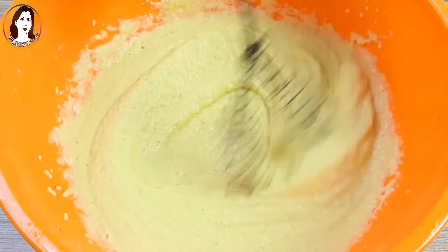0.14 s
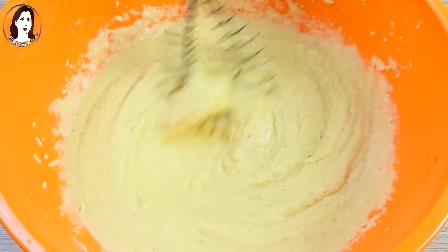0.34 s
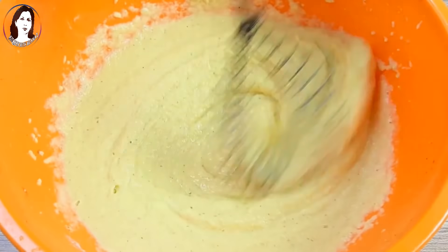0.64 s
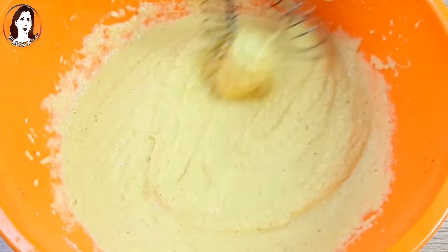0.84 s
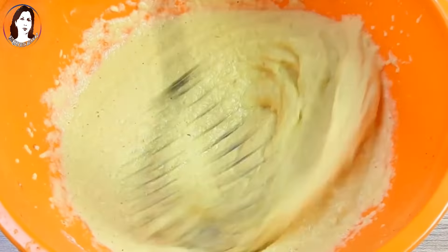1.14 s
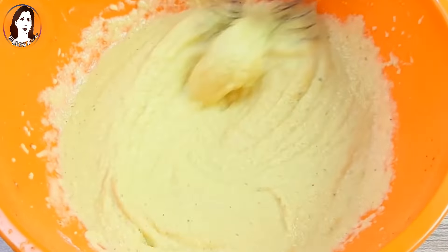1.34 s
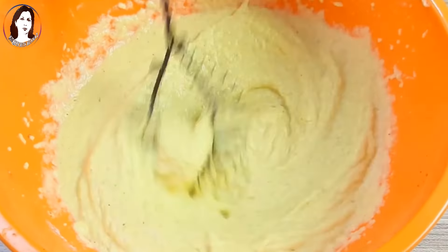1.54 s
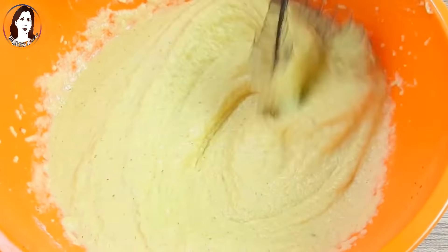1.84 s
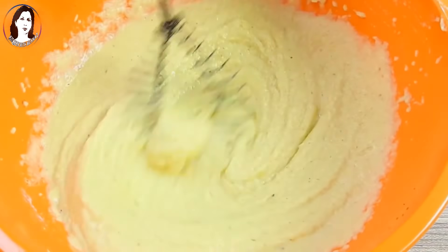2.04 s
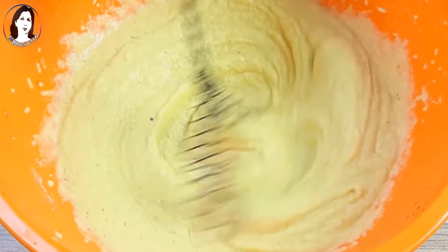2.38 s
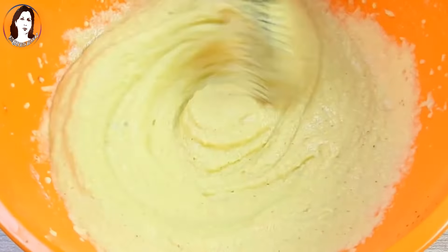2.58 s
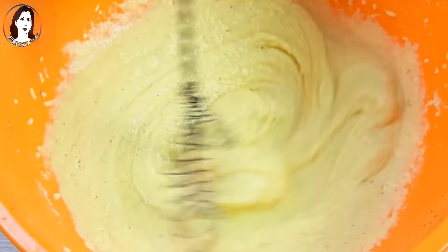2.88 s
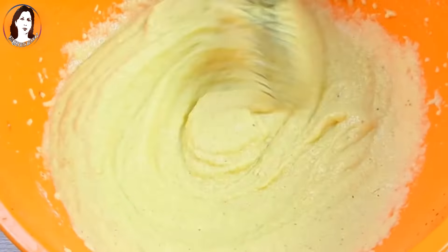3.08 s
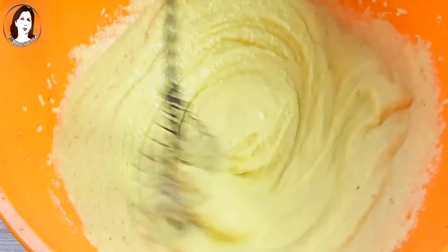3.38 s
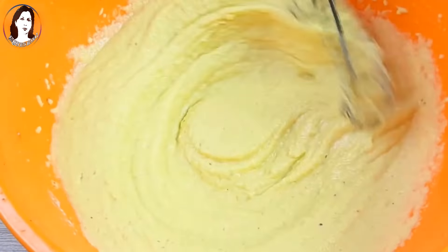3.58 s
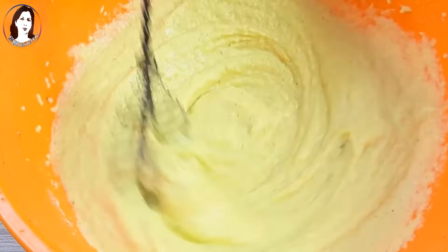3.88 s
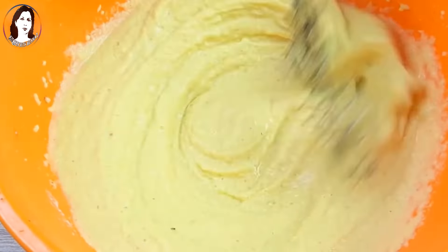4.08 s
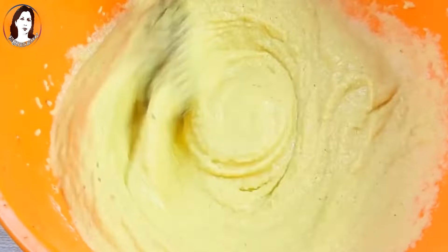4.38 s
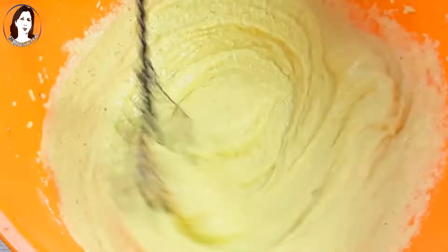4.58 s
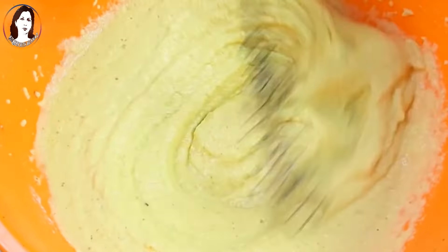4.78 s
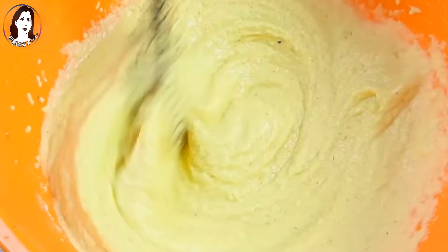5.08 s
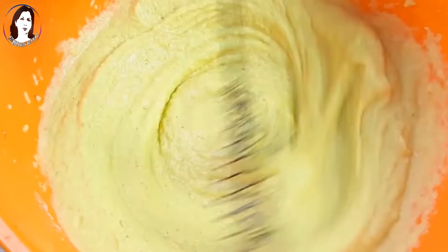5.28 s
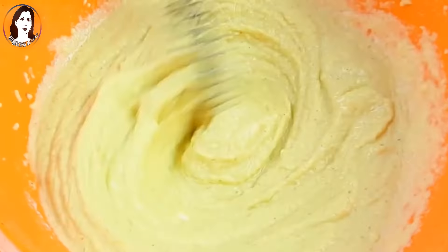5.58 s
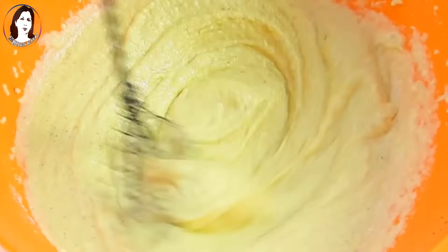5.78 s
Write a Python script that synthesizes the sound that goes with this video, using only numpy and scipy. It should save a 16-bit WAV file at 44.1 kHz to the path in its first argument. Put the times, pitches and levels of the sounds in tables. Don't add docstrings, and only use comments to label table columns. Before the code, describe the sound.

Rapid whisking heard very close and almost mono. Thin metal wires tap a plastic bowl, first faint and scattered while the bowl rocks loosely, then louder and more regular once it is held down. Every tick has a tiny metallic ping, a short hollow plastic knock and a sticky sizzling tail; low thuds from the bowl bottom pulse underneath. The room is quiet and dry, with faint hiss.

```python
import sys
import numpy as np
from scipy import signal
from scipy.fft import rfft, irfft, next_fast_len
from scipy.io import wavfile
from scipy.ndimage import uniform_filter1d

SR = 44100
rng = np.random.default_rng(int(sys.argv[2]) if len(sys.argv) > 2 else 0)


def gain_from_db(level_db):
    decades = np.asarray(level_db, float) / 20
    return 10 ** decades


def bounce(signal):
    frames = np.transpose(np.atleast_2d(signal))
    limited = np.clip(frames, -1, 1)
    pcm = np.round(limited * 32767).astype(np.int16)
    wavfile.write(sys.argv[1], SR, pcm)


N = 261336
GRIP_S = 2.3

# (frequency [Hz], width [Hz], level [dB])
BOTTOM_MODES = [(99.3, 15, -15.5), (126.8, 19, -10.5), (161.7, 28, 0.5), (190.2, 29, -2.5),
                (208.1, 13.5, -0.5)]
# (frequency [Hz], width [Hz], level [dB])
WALL_MODES = [(571, 39, 0.5), (664, 42, 3), (776, 59, 3.5), (940, 88, 6.5), (1069.5, 67, 3),
              (1249.5, 49, 6), (1630, 95, -21), (1690, 2500, -52), (1000.5, 31, 4.5), (2173, 54, -8)]
# (frequency [Hz], width [Hz], level [dB])
FLANK_MODES = [(334.3, 18, 5), (395, 13.5, -6), (472, 17, -5.5), (566, 32.5, 5.5), (640, 67, 0)]
# (frequency [Hz], density [dB per Hz])
WET_COLOUR = [(880, -24), (1500, -2), (1910, -12.5), (2380, -3), (2710, -3.5), (3780, -2), (11200, -7),
              (14600, -9), (16000, -16), (16500, -63)]
# (time [s], boom level [dB], upper modes above the boom [dB])
SHOVES = [(1.294, -25, -5.5), (1.548, -37.5, 1), (1.651, -23, -3.5), (1.888, -25.5, -2.5),
          (2.485, -32.5, -8), (2.62, -24, -8.5), (2.733, -30, -8.5), (2.853, -32.5, -16.5),
          (3.143, -33.5, -6), (3.349, -26.5, -18), (3.478, -28, -23), (3.602, -25, -6), (3.738, -26.5, -9),
          (4.09, -33, -15), (4.128, -37, -19), (4.231, -34.5, 1), (4.328, -27.5, -5), (4.444, -22, -11.5),
          (4.553, -32.5, -11), (4.673, -40, -26), (4.8, -31.5, -13), (5.021, -28.5, -7), (5.049, -28, 0),
          (5.098, -26, -12), (5.163, -37, 4), (5.275, -54, 17), (5.396, -24.5, -12), (5.539, -23.5, -1.5),
          (5.652, -25, -16), (5.895, -35, -3.5)]
# (time [s], tick peak [dB], wall ring above tick [dB], wire ping [Hz])
LANDINGS = [(2.3418, -29, -1.5, 9100), (2.4636, -19.5, -3.5, 6900), (2.583, -18.5, -4.5, 2110),
            (2.7007, -21.5, 1.5, 2350), (2.8229, -29.5, 9.5, 1980), (2.951, -24, 3.5, 1960),
            (3.0761, -27.5, 0, 3700), (3.198, -13.5, -6.5, 2374), (3.3191, -22.5, 0.5, 5730),
            (3.437, -21, -1, 5240), (3.5586, -31.5, 9, 2380), (3.6781, -21.5, 0, 6070),
            (3.804, -43.5, 3, 11100), (3.9297, -35, 7.5, 2120), (4.051, -31.5, 6.5, 2270),
            (4.1674, -29.5, 4, 5200), (4.2814, -33, 5.5, 6960), (4.395, -53, 33, 3800),
            (4.5141, -44.5, 19.5, 3270), (4.6273, -50, 17, 4600), (4.7485, -15.5, -6, 6530),
            (4.8678, -30.5, -4.5, 3800), (4.9814, -31, 4, 6100), (5.103, -15, 0.5, 4700),
            (5.2259, -29.5, 6, 4900), (5.482, -33, 3, 2260), (5.6006, -28.5, 6.5, 6030),
            (5.7179, -28.5, -14, 3670), (5.8322, -38.5, 13, 4100)]


def unit(x):
    return x / np.sqrt(np.mean(x ** 2) + 1e-20)


def along(points, hz):
    f, v = np.transpose(points)
    return np.interp(np.log(hz + 1), np.log(f + 1), v)


def filtered(x, response):
    m = next_fast_len(len(x) + 8192)
    hz = np.fft.rfftfreq(m, 1 / SR)
    return irfft(rfft(x, m, axis=0) * response(hz), m, axis=0)[:len(x)]


def steep(x, hz, kind, order=8):
    return signal.sosfilt(signal.butter(order, hz, kind, fs=SR, output="sos"), x)


def coloured(x, spectrum):
    def gain(hz):
        return gain_from_db(along(spectrum, hz))
    return filtered(x, gain) / np.sqrt(np.mean(gain(np.linspace(0, SR / 2, 4000)) ** 2))


def resonance(hz, centre, width):
    return 1j * hz * width / (centre * centre - hz * hz + 1j * hz * width)


def body(x, modes):
    def gain(f):
        return sum((-1) ** k * gain_from_db(db) * resonance(f, hz, width) for k, (hz, width, db) in enumerate(modes))
    return filtered(x, gain) / np.sqrt(np.mean(abs(gain(np.linspace(0, SR / 2, 40000))) ** 2))


def ringing(modes, t, damping, scatter_db):
    hz, width, db = np.transpose(modes)[:, :, None]
    luck = rng.standard_normal((2, len(modes), 1))
    strength = gain_from_db(db + scatter_db * luck[0])
    decay = np.exp(-np.pi * damping * width * abs(t))
    swing = np.sin(2 * np.pi * hz * (1 + .012 * luck[1]) * t)
    ring = np.sum(strength * decay * swing, axis=0)
    return ring / np.max(abs(ring))


def gritty(size, rate, spread_db):
    knots = np.minimum(rng.exponential(size=int(size * rate / SR) + 2), 3)
    strength = np.interp(np.arange(size) * rate / SR, np.arange(len(knots)), knots)
    return unit(rng.standard_normal(size) * gain_from_db(spread_db * strength))


def patchy(x, depth_db):
    z = signal.stft(x, nperseg=128)[2]
    luck = rng.standard_normal(z.shape)
    clumps = unit(uniform_filter1d(uniform_filter1d(luck, size=5, axis=0), size=7, axis=1))
    lines = unit(uniform_filter1d(uniform_filter1d(luck, size=2, axis=0), size=35, axis=1))
    field = unit(clumps + 1.3 * lines)
    return unit(signal.istft(z * gain_from_db(depth_db * field), nperseg=128)[1][:len(x)])


def two_tone(x, dull, bright, spectrum):
    low = steep(x, 2250, "low", order=1)
    return steep(coloured(dull * low + bright * (x - low), spectrum), 1340, "high", order=4)


def kitchen(contact):
    # (frequency [Hz], density [dB per Hz])
    room_colour = [(25, 6), (150, -16.5), (560, -27.5), (950, -24.5), (1300, -10), (1500, -49),
                   (2600, -9.5), (8000, -23), (12000, -21), (14500, -39)]
    return gain_from_db(-70.5) * contact ** 0.16 * coloured(rng.standard_normal(N), room_colour)


def squelch():
    late_s, spread_s = 0.0086, 0.023
    t = np.arange(N) / SR
    swell = sum(gain_from_db(db - 21.5) * np.exp(-((t - s - late_s) / spread_s) ** 2) for s, db, _ in SHOVES)
    return two_tone(gritty(N, rate=550, spread_db=5.5), swell, 0.54 * swell, WET_COLOUR)


def stir(contact):
    # (time [s], effort [dB], downward pressure [dB])
    hand = [(0, -88, 0), (.27, -72.5, 0.5), (.4, -68, -2.5), (.54, -77.5, -5), (.68, -65.5, -4.5),
            (.94, -68.5, -4), (1.22, -70, -0.5), (1.35, -55.5, -3.5), (2.07, -59, -5), (2.19, -65.5, -2),
            (2.32, -65, -3.5), (2.4, -57, -8.5), (3.24, -57, -3), (3.51, -54.5, 3), (3.78, -57, -5),
            (4.4, -54.5, 1.5), (5.2, -56, -0.5), (5.93, -56, 0)]
    s, *levels = np.transpose(hand)
    hiss_db, press_db = (np.interp(np.arange(N) / SR, s, level) for level in levels)
    wall_db = -52.5 + 0.7 * (hiss_db + 57.5) + press_db
    bottom_db = -51 + 2.06 * (hiss_db + 57.5) + 1.26 * press_db

    grain = patchy(gritty(N, rate=220, spread_db=2), depth_db=5)
    flow = gain_from_db(hiss_db + 6.0) * contact
    brightness = gain_from_db(0.49 * (hiss_db + 45.5))
    hiss = two_tone(grain, flow, flow * brightness, WET_COLOUR)

    wall = body(gain_from_db(wall_db) * contact * gritty(N, rate=92, spread_db=3.5), WALL_MODES)
    low_share = gain_from_db(2.3 * np.minimum(wall_db + 58.0, 0))
    wall = steep(wall, 1184, "high", order=4) + low_share * steep(wall, 748, "low", order=4)

    shake = gain_from_db(bottom_db - 3) * contact ** 0.83 * gritty(N, rate=40, spread_db=3)
    bottom = steep(steep(body(shake, BOTTOM_MODES), 272, "low"), 113, "high", order=3)
    flank = body(shake * gain_from_db(.5 * (bottom_db + 46.0)), FLANK_MODES)
    flank = gain_from_db(-13.0) * steep(flank, 247, "high", order=4)
    return hiss + steep(wall, 483, "high") + bottom + flank


def drags(contact):
    # (time [s], boom level [dB])
    nudges = [(0.92, -50), (1.174, -39.5), (1.419, -34.5), (1.478, -42), (1.765, -40.5), (2.009, -42),
              (2.34, -36), (2.356, -35), (2.464, -34), (2.581, -31.5), (2.697, -33), (2.818, -34.5),
              (2.949, -30.5), (3.075, -45), (3.094, -36), (3.194, -34), (3.314, -46), (3.434, -60),
              (3.86, -39), (3.926, -39), (3.981, -41), (4.749, -43), (4.913, -31), (5.784, -32.5),
              (5.849, -46)]
    # (time [s], boom level [dB])
    further_nudges = [(0.046, -66), (0.306, -69), (0.334, -75), (0.374, -80), (0.447, -69), (0.562, -58),
                      (0.607, -57), (0.681, -56.5), (0.803, -79), (1.002, -72), (1.046, -56), (1.128, -76),
                      (1.325, -40), (1.351, -53), (1.452, -54), (1.516, -36), (1.608, -64), (1.795, -42),
                      (1.831, -52), (2.032, -51), (2.068, -50), (2.108, -48), (2.138, -59), (2.432, -67),
                      (2.517, -39), (2.548, -53), (2.762, -51), (2.896, -42.5), (2.921, -52), (3.017, -53),
                      (3.226, -35.5), (3.383, -62), (3.629, -30.5), (3.672, -46), (3.713, -45), (3.797, -43),
                      (3.95, -41), (4.046, -43), (4.161, -52), (4.196, -32), (4.278, -53), (4.353, -36.5),
                      (4.39, -54), (4.511, -37), (4.589, -51), (4.613, -43), (4.777, -33.5), (4.947, -48),
                      (4.984, -52), (5.253, -31.5), (5.328, -46), (5.48, -47), (5.507, -33), (5.62, -41),
                      (5.687, -64), (5.763, -34), (5.828, -52), (5.868, -37)]
    soft_push_db = -26.5
    loose_db, held_db = 5, -11.5
    swell_s, crest_s = 0.021, 0.00954
    rise, rise_s = 0.048, 0.029
    early = SR // 50
    pushes = [(s, db, soft_push_db) for s, db in nudges] + SHOVES
    pushes = pushes + [(s, db + 0.5, soft_push_db) for s, db in further_nudges]

    boom, flank, press = np.zeros((3, N + SR))
    t = np.arange(SR // 7) / SR
    for s, db, hard_db in pushes:
        at = slice(round(s * SR), round(s * SR) + len(t))
        lowest_db = loose_db if s < GRIP_S else held_db
        modes = [(hz, width, level + (hz < 140) * lowest_db) for hz, width, level in BOTTOM_MODES]
        sudden = 0.35 if s < GRIP_S else 1
        u = t - early / SR - sudden * crest_s
        swell = np.exp(-(np.minimum(u, 0) / (sudden * swell_s)) ** 2)
        bent = u + rise * u * abs(u) / (abs(u) + rise_s)
        boom[at] += gain_from_db(db - 3.5) * swell * ringing(modes, bent, damping=0.51, scatter_db=8.0)
        onset = 1 - np.exp(-t / 0.0039)
        flank[at] += gain_from_db(db + hard_db + 9.5) * onset * ringing(FLANK_MODES, t, damping=1.73, scatter_db=1.5)
        press[at] += gain_from_db(db - 20.5) * (1 - np.exp(-t / 0.0019)) * gain_from_db(-60 * t / 0.16)
    rumble = body(press[:N] * gritty(N, rate=270, spread_db=1.0), WALL_MODES)
    low = steep(boom[early:N + early] * contact ** 0.76, 241.3, "low")
    return low + steep(flank[:N], 359, "high", order=4) + steep(rumble, 538, "high")


def contacts():
    # (time [s], tick peak [dB], wall ring above tick [dB], wire ping [Hz])
    flicks = [(.051, -33.5, -37, 3770), (.1768, -36.5, -24, 3020), (.2517, -44.5, -3, 10300),
              (.4954, -44, -33, 10100), (.621, -44, -18, 10400), (.6857, -27.5, -30, 2180),
              (.7451, -41, -31, 13400), (.7656, -38, -18, 4170), (.0125, -36.5, -37, 10900),
              (.237, -49, -21, 9900), (1.0478, -16.5, -23, 13740), (1.1, -53, -28, 12800),
              (1.1181, -48, -35, 10400), (1.171, -34, -15, 3420), (1.2533, -27.5, -38, 2900),
              (1.2976, -10, -14.5, 2400), (1.3555, -34, -4, 2280), (1.376, -25.5, -29, 9500),
              (1.426, -27, -0.5, 4600), (1.4837, -30.5, -7, 2200), (1.6292, -33, -13, 12800),
              (1.7222, -29.5, -29, 10100), (1.7509, -35, -28, 9800), (1.8692, -30, -14, 8900),
              (1.8925, -21.5, -8, 2990), (1.9913, -31.5, -13, 3070), (2.1112, -30, -30, 7830),
              (2.2147, -43.5, 3.5, 2430), (2.3183, -42, -7, 10900)]
    # (time [s], tick peak [dB], wall ring above tick [dB], wire ping [Hz])
    smears = [(.0202, -40, -42, 11100), (.1424, -33.5, -42.5, 5340), (.2661, -42.5, -0.5, 2170),
              (.3085, -26.5, -14.5, 6100), (.397, -44, -3.5, 9600), (.4075, -33.5, -25, 4540),
              (.4419, -29, -32, 3050), (.5638, -27.5, -47, 2770), (.6783, -38, -16, 3030),
              (.8114, -22.5, -21, 4430), (.9276, -37, -2.5, 2640), (1.0424, -24, -17, 7100),
              (1.1788, -27.5, 0.5, 3680), (1.291, -17.5, -16, 8380), (1.4949, -23.5, -26, 5600),
              (1.5496, -24.5, -11, 3560), (1.6551, -25.5, -35, 3690), (1.7667, -32.5, -23, 3200),
              (1.9503, -30.5, -17, 3340), (2.0725, -30, -11, 3790), (2.2655, -38, -2.5, 7130)]
    # (time [s], tick peak [dB], wall ring above tick [dB], wire ping [Hz])
    slaps = [(2.504, -33, 3, 3830), (2.6183, -25.5, 0.5, 7400), (2.7342, -40, 8, 3620),
             (2.776, -33, -20, 3430), (3.0265, -35.5, -23, 3350), (3.1468, -33, -3, 3800),
             (3.3616, -30, 9.5, 3700), (3.4837, -27.5, 11, 7200), (3.6055, -27, 9, 7500),
             (3.6258, -17.5, 0, 3140), (4.092, -27, 0, 9850), (4.1131, -26.5, 2, 2400),
             (4.2335, -30, 6.5, 3380), (4.3286, -18, 1, 9200), (4.4, -38, -6, 3100),
             (4.4397, -23.5, 0, 9600), (4.4502, -20, 5, 8900), (4.552, -26.5, -2, 4320),
             (4.591, -18, -3, 3690), (4.6769, -24.5, 3, 4950), (5.051, -14, -15, 3230),
             (5.163, -21, -3, 3510), (5.2654, -24, 1.5, 8700), (5.401, -21.5, 5, 4570),
             (5.5165, -24.5, 1.5, 3830), (5.5449, -11.5, -7, 5240), (5.666, -40, 3, 2370),
             (5.7867, -18, -12, 3010), (5.7955, -23, -10, 3090), (5.875, -32, -18, 9160)]
    # (time [s], tick peak [dB])
    knocks = [(2.63, -36), (3.2526, -38), (3.494, -29), (4.2103, -34), (4.222, -32), (4.3197, -33),
              (4.8964, -45), (4.9172, -29), (5.0322, -62), (5.638, -32), (5.7367, -40), (5.7494, -42),
              (5.7647, -37)]
    # (time [s], tick peak [dB], wire ping [Hz])
    pips = [(.862, -56, 5000), (.875, -67, 10500), (0.887, -57, 10300), (0.913, -38, 5000),
            (1.002, -51, 3020), (1.059, -45, 3770), (1.23, -50, 9000), (1.26, -30, 6600),
            (1.274, -67, 4450), (1.397, -28, 3540), (1.525, -28, 5630), (2.16, -37, 2890)]
    # (time [s], tick peak [dB], wire ping [Hz])
    crackles = [(0.122, -59, 5100), (0.3837, -45, 2700), (0.515, -65, 8450), (0.6414, -59, 2780),
                (0.663, -50, 4320), (0.9387, -35, 2290), (1.152, -55, 2150), (1.6054, -62, 5530),
                (1.6563, -19.5, 2670), (1.804, -33, 2530), (1.8331, -32, 2360), (2.0422, -33.5, 2610),
                (2.0787, -31, 9660), (2.231, -60, 3330), (2.2534, -64, 2290), (2.364, -26, 8730),
                (2.3818, -35, 7650), (2.4517, -37, 2120), (2.4876, -34, 3870), (2.727, -30, 3730),
                (2.8455, -26, 3700), (2.905, -50, 2560), (3.1037, -34, 3630), (3.279, -30.5, 2310),
                (3.349, -25, 6130), (3.378, -37, 2310), (3.473, -24.5, 8800), (3.5898, -23.5, 4360),
                (3.733, -40, 8120), (3.749, -33, 2500), (3.8102, -32.5, 10500), (3.832, -46, 4330),
                (3.8496, -47, 3800), (3.8807, -33.5, 3800), (3.9474, -61, 3900), (3.9612, -34, 10200),
                (4.0128, -28.5, 3560), (4.0768, -57, 9600), (4.1408, -32, 5800), (4.2547, -24, 9950),
                (4.4922, -29, 2250), (4.557, -24, 3730), (4.6384, -54, 5770), (4.7105, -26, 2494),
                (4.785, -23.5, 3690), (4.8234, -27, 3170), (4.8824, -36, 9300), (4.9415, -24, 3470),
                (5.012, -34, 3580), (5.134, -24, 3700), (5.28, -35, 3730), (5.3233, -32, 9030),
                (5.3657, -61, 8590), (5.3865, -39, 3770), (5.4303, -23, 3560), (5.5524, -47, 5360),
                (5.6761, -23, 3800), (5.908, -32, 3320)]
    # (contacts, wet tail below the tick [dB], hush as the coil lifts clear just before [dB],
    #  hush deepened per dB a tick is harder)
    kinds = [(flicks, -24.5, -7, 0),
             (smears, -20, -0.2, 0),
             (LANDINGS, -24, -7.5, 0.18),
             (slaps, -21.5, 0.67, 0),
             ([(s, db, 8, 3800) for s, db in knocks], -22, -0.05, 0),
             ([(s, db, -18, hz) for s, db, hz in pips], -23, -4, 0),
             ([(s, db - 6, -4, hz) for s, db, hz in crackles], -16, -1.05, 0)]
    return [(s, db, wall_db, hz, tail_db - 0.23 * (db + 34.0), lift_db - freer * (db + 28.0))
            for rows, tail_db, lift_db, freer in kinds for s, db, wall_db, hz in rows]


def lifting():
    hush_db = np.zeros(N + SR)
    t = np.arange(SR // 10) / SR
    for s, *_, lift_db in contacts():
        end = round(s * SR) + len(t)
        hush_db[end - len(t):end] += 1.35 * min(lift_db, 0) * np.exp(-(t[::-1] / 0.029) ** 2)
    return gain_from_db(hush_db[len(t):N + len(t)])


def landing_blows():
    # (frequency [Hz], width [Hz], level [dB])
    rim_modes = [(1527, 77, 20), (1756, 17, 7.5), (2230, 97, -32), (2175, 72, 0), (2311, 95, 19.5),
                 (2400, 69, -23)]
    thud_s = 0.00059
    spike, rim, thud = np.zeros((3, N + SR))
    t = np.arange(SR // 10) / SR
    for s, db, wall_db, _ in LANDINGS:
        start = round(s * SR)
        at = slice(start, start + len(t))
        spike[start:start + 3] += gain_from_db(db + .5 * min(wall_db, 8) - 1) * np.hanning(5)[1:4]
        rim_db = db + .5 * min(wall_db, 6) - 13.5
        rim[at] += gain_from_db(rim_db) * ringing(rim_modes, t, damping=0.68, scatter_db=0.5)
        thud[at] += gain_from_db(db + min(wall_db, 8) - 27.5) * np.e * t / thud_s * np.exp(-t / thud_s)
    return steep(spike[:N], 740, "high", order=4) + gain_from_db(-6.5) * steep(rim[:N], 570, "high") + thud[:N]


def ticks(contact):
    # (frequency [Hz], density [dB per Hz])
    snap_colour = [(880, -49), (1500, -63), (2360, 8.5), (2910, -2.5), (4260, 0), (9790, 4), (10800, 2.5),
                   (16500, -11)]
    snap, ping, dull, bright, wall = np.zeros((5, N + SR))
    t = np.arange(SR // 10) / SR
    for s, db, wall_db, ping_hz, tail_db, lift_db in contacts():
        at = slice(round(s * SR), round(s * SR) + len(t))
        clean = np.clip(-lift_db / 12, 0, 1)
        soft = np.clip((-31 - db) / 14, 0, .9)

        crack = gain_from_db(-60 * t / (.004 - 0.0019 * clean)) * rng.standard_normal(len(t))
        narrow = signal.lfilter(*signal.iirpeak(ping_hz, 1.5, SR), crack)
        crack = (1 - soft) * crack / np.max(abs(crack)) + soft * narrow / np.max(abs(narrow))
        snap[at] += gain_from_db(db - 6.0 + 4.0 * clean) * crack / np.max(abs(crack))

        chatter = signal.lfilter([1], [1, -.9], rng.standard_normal((2, len(t))))
        chatter = 3 * (1 - np.exp(-t / 0.00065)) * chatter / np.max(abs(chatter))
        turn = 2 * np.pi * ping_hz * t
        strike = gain_from_db(-60 * t / 0.006) * (1 - np.exp(-t / 0.000053))
        ping[at] += gain_from_db(db - 6.5 - 2.9 * clean) * strike * np.sin(turn + chatter[0])
        hum = chatter[0] * np.cos(turn) + chatter[1] * np.sin(turn)
        ping[at] += gain_from_db(db + tail_db - 1.5 - 60 * t / 0.12) * hum

        onset = 1 - (1 - clean) * np.exp(-t / 0.00056)
        tail = gain_from_db(db + tail_db) * onset * (gain_from_db(-60 * t / 0.14) + 2.9 * gain_from_db(-60 * t / 0.015))
        lean_db = (3 + 2.3 * soft) * np.log2(ping_hz / 5000)
        dull[at] += gain_from_db(-lean_db) * tail
        bright[at] += gain_from_db(lean_db) * tail

        before = slice(max(at.start - len(t), 0), at.start)
        approach = np.exp(-t[::-1] / 0.0036)[len(t) - (before.stop - before.start):]
        squeeze = (1 - clean) * gain_from_db(db + tail_db - 1) * approach
        dull[before] += squeeze
        bright[before] += squeeze

        rims = [clean * (hz > 1600) * (s > GRIP_S) for hz, *_ in WALL_MODES]
        modes = [(hz, width / (1 + rim), level + 13 * rim)
                 for (hz, width, level), rim in zip(WALL_MODES, rims)]
        wall[at] += gain_from_db(db + wall_db + 2.5) * ringing(modes, t, damping=1.3, scatter_db=3.5)
    grain = patchy(gritty(N, rate=900, spread_db=2), depth_db=4.5)
    sizzle = gain_from_db(-2.5) * two_tone(grain, dull[:N] * contact, bright[:N] * contact, WET_COLOUR)
    wires = steep(coloured(snap[:N], snap_colour) + ping[:N], 740, "high", order=4)
    return wires + sizzle + gain_from_db(-6.5) * steep(wall[:N], 570, "high") + landing_blows()


def shaded(x):
    # (frequency [Hz], width [Hz], hidden share [0-1])
    shadow = [(1510, 370, 0.81), (6600, 4900, 0.76)]
    loose = np.clip((GRIP_S - np.arange(N) / SR) / 2.5, 0, 1)
    hidden = filtered(x, lambda f: sum(np.clip(share, 0, 1) * resonance(f, c, w) for c, w, share in shadow))
    return x - loose * hidden


def streaked(x):
    # (frequency [Hz], depth [dB])
    streak_depth = [(300, 0.5), (1500, 2), (5000, 2.5), (14000, 4.5)]
    hz, _, z = signal.stft(x, SR, nperseg=256)
    luck = rng.standard_normal(z.shape)
    field = unit(uniform_filter1d(uniform_filter1d(luck, size=3, axis=0), size=18, axis=1))
    gain = gain_from_db(along(streak_depth, hz)[:, None] * np.clip(field, -3, 1.2))
    gain = gain / np.sqrt(np.mean(gain ** 2, axis=1, keepdims=True))
    return signal.istft(z * gain, SR, nperseg=256)[1][:len(x)]


def reflections(mid):
    # (frequency [Hz], side relative to mid [dB])
    apart = [(60, -31), (110, -42), (200, -52), (380, -43), (700, -41), (1290, -22.5), (2380, -17),
             (4400, -19), (8120, -19), (15000, -11)]
    restless = unit(steep(rng.standard_normal(N), 57, "low", order=2))
    return restless * filtered(mid, lambda hz: gain_from_db(along(apart, hz)))


def scene():
    contact = lifting()
    mid = kitchen(contact) + squelch() + stir(contact) + drags(contact) + ticks(contact)
    mid = streaked(shaded(mid))
    side = reflections(mid)
    return np.array([mid + side, mid - side])


def top_cut(x):
    return signal.sosfilt(signal.butter(12, 16980, fs=SR, output="sos"), x)


def record(dry):
    thin = steep(dry, 88, "high", order=3) + gain_from_db(-33.5) * dry
    shelf = [(15700, 0), (16050, -14), (16750, -16), (16900, -60)]  # (frequency [Hz], gain [dB])
    thin = filtered(thin.T, lambda hz: gain_from_db(along(shelf, hz))[:, None]).T
    return top_cut(thin)


dry = scene()
out = record(dry)
bounce(out)
```